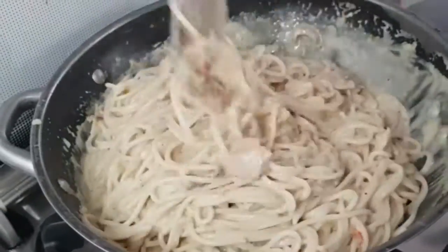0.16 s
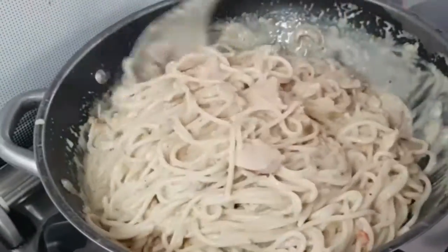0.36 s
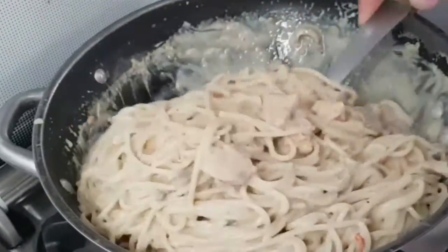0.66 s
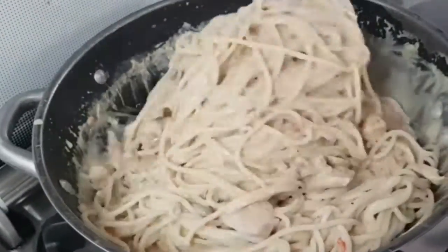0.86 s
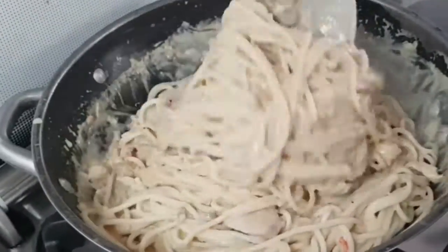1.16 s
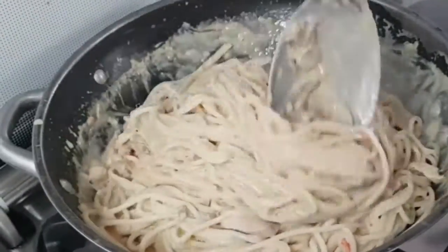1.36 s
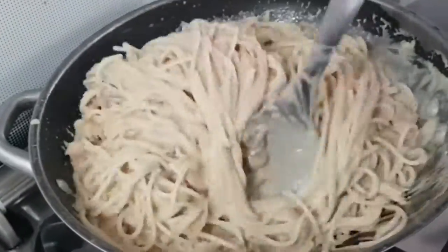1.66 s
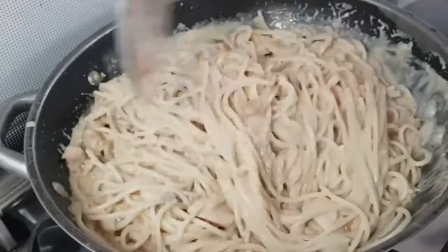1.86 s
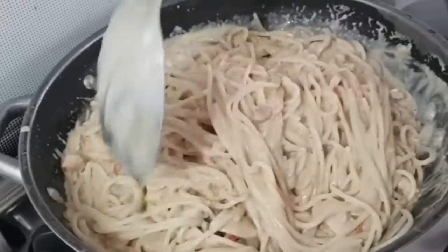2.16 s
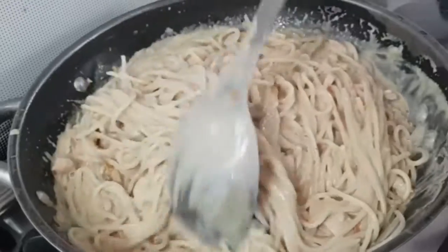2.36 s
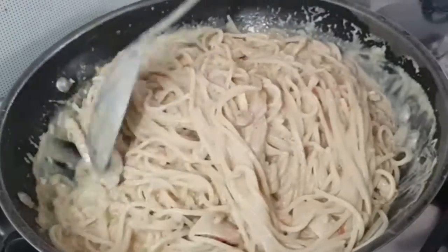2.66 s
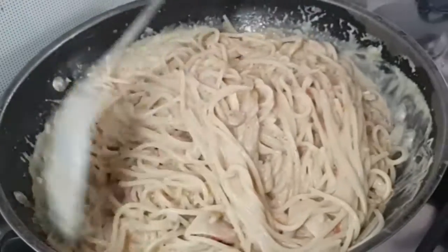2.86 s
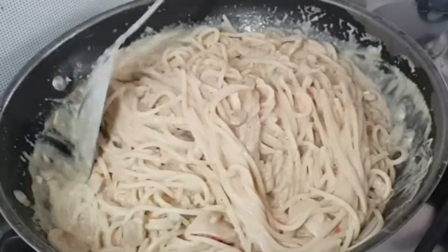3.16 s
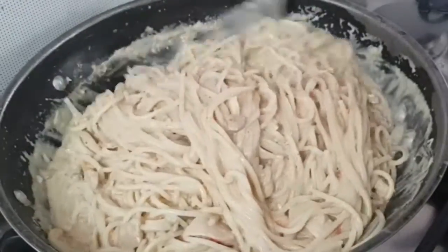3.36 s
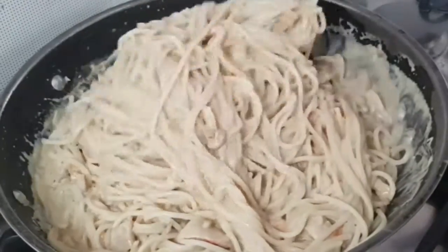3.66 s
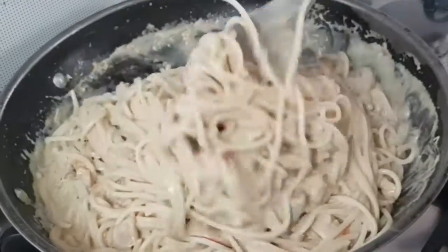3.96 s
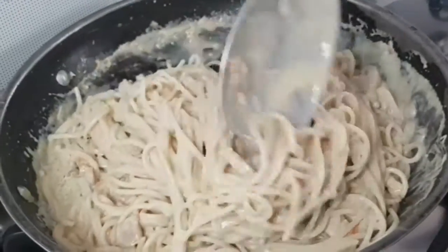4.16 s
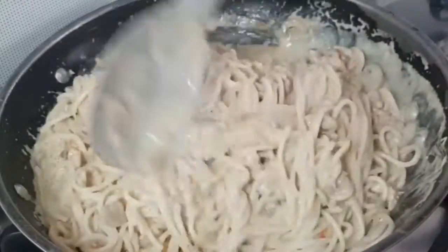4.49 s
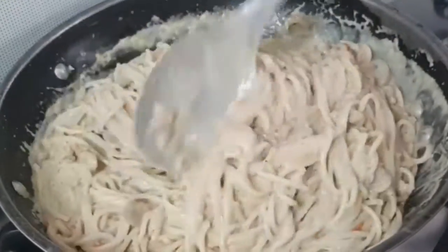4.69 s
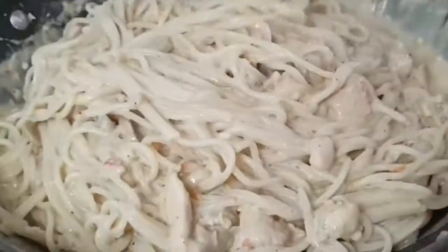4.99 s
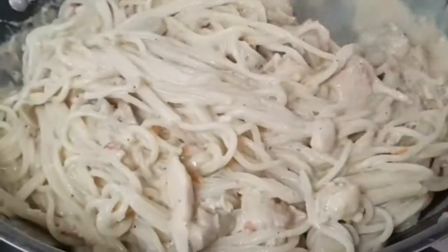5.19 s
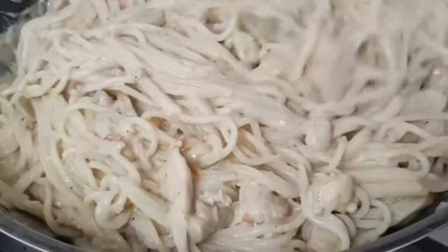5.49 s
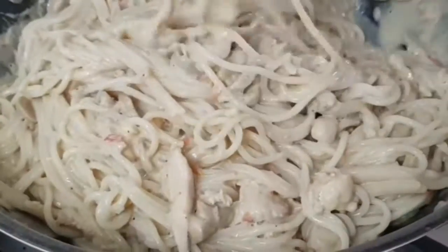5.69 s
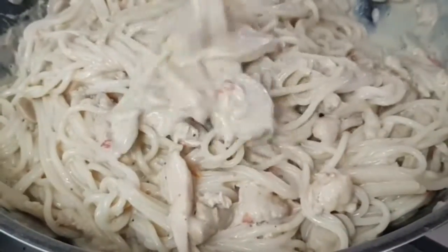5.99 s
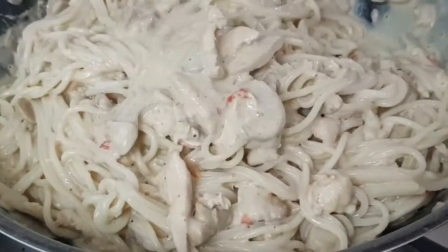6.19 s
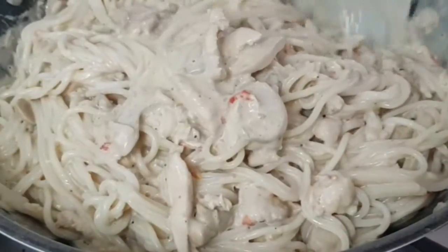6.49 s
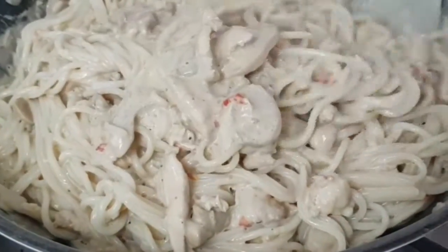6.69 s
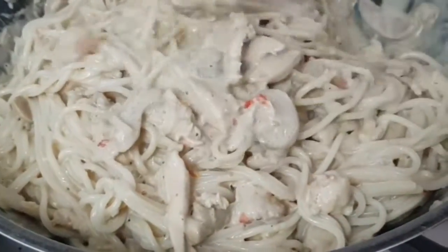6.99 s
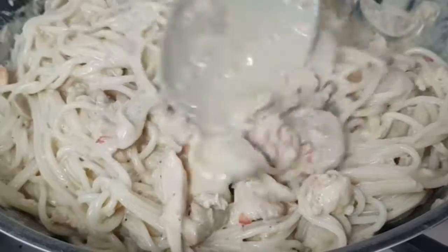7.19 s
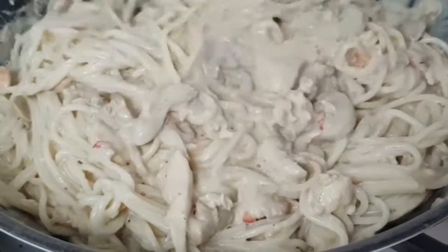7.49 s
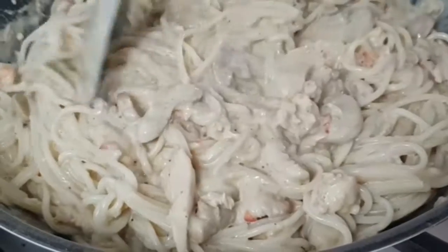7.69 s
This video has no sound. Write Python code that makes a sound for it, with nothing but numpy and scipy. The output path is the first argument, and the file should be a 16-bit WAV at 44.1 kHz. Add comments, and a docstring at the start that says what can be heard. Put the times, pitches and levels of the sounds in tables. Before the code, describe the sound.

Close stereo pickup in a small home kitchen. A spatula turns spaghetti in thick cream sauce, with wet smacks at the start, then a quick cluster of hollow pan knocks. Quiet sticky squelching follows, then another sharp knock, light scrapes and tiny squeaks. A busier scrape ends in the loudest knock past the middle; afterwards mostly wet, crackly squelching, over faint simmer and low mains hum.

```python
"""Small kitchen, heard close up: spaghetti in thick cream sauce is turned with a spatula in a nonstick pan.
Blade blows and scrapes drive damped modes of the pan; its bumps on the grate ring the hob.
The blade squeaks as gliding tones; the sauce squelches, smacks and sizzles as shaped random grains, noise and pops.
An appliance hums as drifting sines over fan air made of coloured noise."""
import sys
import numpy as np
from scipy import signal
from scipy.fft import rfft, irfft, next_fast_len
from scipy.io import wavfile
from scipy.ndimage import uniform_filter1d

SR = 44100
rng = np.random.default_rng(int(sys.argv[2]) if len(sys.argv) > 2 else 0)


def generate_wav(sig):
    """Save sig (samples, or channels by samples) to the path in sys.argv[1] as 16-bit PCM at SR."""
    pcm = np.round(np.clip(np.atleast_2d(sig).T, -1, 1) * 32767).astype(np.int16)
    wavfile.write(sys.argv[1], SR, pcm)


N = 346185
T = np.arange(N) / SR  # seconds
RING_T = T[:SR // 2]

# Blade meets pan. Each row: start in seconds, relative strength in dB, height from floor 0 to bare wall 1,
# relative blade tick in dB, chatter decay constant in seconds, ratio applied to the pan's mode frequencies.
KNOCKS = [(0.4447, -13, 0.62, -19, .0045, 1.03), (0.463, -20, 0.56, -30, .0057, 1.06),
          (0.4743, -24.5, 0.69, -29.5, .003, 1.9), (0.589, -36.5, .7, -66, .01, 1.1),
          (.78, -40, 0.24, -61, 0.021, .59), (1.623, -29, .2, -38, .008, .57),
          (1.655, -26.5, 0.63, -42, .005, 0.78), (1.67, -29, 0.77, -48, .004, 0.99),
          (2.599, -33, 0.017, -31.5, .022, 1), (2.835, -9, 0.31, -14.5, .0033, 1.055),
          (2.8465, -18.5, 0.37, -27, .0037, 0.71), (3.109, -18, 0.054, -15.5, .0042, 1.06),
          (3.1177, -27.5, 0.076, -18, .0036, 1), (3.1235, -20.5, 0.28, -47, .019, 1.01),
          (4.3482, -19, .13, -14, .001, 0.68), (4.373, -54, 0.4, -33, .003, 0.59),
          (4.9541, -23, 0.11, -20, .0048, 1.03), (5.035, -25.5, 0.34, -55, .013, .82),
          (5.207, -25.5, 0.71, -50, .006, 1.05), (5.258, -27, .02, -44, .002, 1),
          (5.4258, -14.5, .9, -25.5, .0035, .95), (5.434, -7, 0.93, -22, .0038, .93),
          (5.446, -19.5, 0.91, -24, .0024, 0.65), (5.467, -28, 0.23, -35.5, .006, 0.82),
          (6.572, -37.5, 0.24, -42, .006, 1.1), (6.6672, -27, 0.4, -21.5, .0016, 0.88)]
# Pan rocks back onto its grate. Each row: start in seconds, level in dB.
ROCKS = [(2.851, -20), (2.884, -28), (2.946, -29), (3.125, -25), (4.386, -31)]
# Modes, nominal before ring() shifts and damps them. Each row: frequency in Hz, relative level in dB,
# t60 in seconds. In turn: loaded pan, its floor on the grate, bare wall (a pair), hob under the pan.
PAN_MODES = [(824, -5, 0.038), (989.5, 0, 0.062), (1115, 1.5, 0.098), (1339, 1.5, 0.044),
             (1484, 2.5, 0.041), (1889, -5.5, 0.11), (2340, -9, 0.084), (2504, -25.5, 0.1),
             (2807, -9.5, 0.17), (3440, -14.5, 0.19), (4110, 2.5, 0.024), (5040, -20.5, 0.075),
             (5490, -16, 0.1), (6200, -34, 0.058)]
FLOOR_MODES = [(145, -4, 0.1), (241.5, -0.5, 0.16), (329, 1.5, 0.06), (377.4, 3.5, 0.088),
               (486.3, -0.5, 0.068), (651.5, -8, 0.1), (800, -18.5, 0.057)]
WALL_MODES = [(1230, -7.5, 0.041), (1230, -16, 0.011)]
HOB_MODES = [(49.8, -0.5, 0.44), (92, -7, 0.27), (119, 13.5, 0.12)]
# Spectra of the blade's dense modes and the pan's crowded minor modes. Each row: Hz, relative dB.
BLADE_SPECTRUM = [(300, -3), (1000, 8.5), (2400, 0), (3300, -1), (4500, 5), (5700, 7.5), (7000, 4),
                  (9000, -0.5), (13000, -1), (15000, -18)]
CLATTER_SPECTRUM = [(150, -35.5), (350, -5.5), (650, -2), (1150, -38.5), (1600, -12), (2300, -1.5),
                    (3500, -7.5), (8000, -54.5)]
# Strokes of the blade. Each row: hardest push in seconds, rise in seconds, release in seconds,
# relative pan level in dB, relative grit level in dB.
SCRAPES = [(.5, 0.018, .2, -42, -40.5), (.68, .03, .04, -44.5, -55.5), (1.622, .05, .05, -38, -33),
           (1.66, 0.065, .05, -34, -35), (2.734, 0.19, .1, -44, -59), (2.93, .02, .35, -48, -62),
           (3.322, 0.091, .1, -36.5, -35.5), (3.39, 0.087, .11, -33.5, -34.5), (3.53, 0.17, .2, -48, -66),
           (5.035, 0.11, .12, -31, -34.5), (5.105, 0.18, .07, -35, -31.5), (5.215, 0.062, .025, -30.5, -54),
           (5.28, 0.15, .15, -45, -58), (5.377, 0.09, .03, -35, -37.5), (5.61, .08, 0.072, -50, -52),
           (6.69, 0.014, .14, -47, -39.5)]
# Pitched stick-slip. Each row: start in seconds, length in seconds, start pitch in Hz, end pitch in Hz,
# level in dB, pitch scatter as a share.
SQUEAKS = [(2.693, 0.12, 2330, 2490, -51, 0.076), (2.705, 0.061, 3700, 3600, -55, 0.017),
           (2.919, 0.17, 1976, 1950, -54, 0.057), (2.928, 0.093, 918, 947, -55, 0.049),
           (3.191, .12, 1820, 1900, -49.5, 0.021), (3.253, 0.091, 1113, 1034, -41, 0.03),
           (3.379, 0.053, 1317, 1212, -35, 0.14), (3.382, 0.022, 2280, 2276, -32, 0.086),
           (3.515, .01, 2570, 2500, -43.5, 0.066), (3.531, 0.023, 1087, 986, -45.5, 0.13),
           (5.003, 0.126, 1020, 1094, -41, 0.1), (5.008, 0.02, 2830, 2786, -33, 0.041),
           (5.061, 0.086, 2480, 2380, -36.5, 0.089), (5.342, 0.05, 2390, 1870, -35.5, 0.11),
           (7.195, 0.012, 3280, 3220, -39, 0.03)]
# Sauce being worked. Each row: time in seconds, squelch in dB, fine fizz in dB, both before the layer gains.
SAUCE_LEVELS = [(0.0, -57.5, -65.5), (1.11, -65.5, -68), (1.62, -59.5, -71), (2.03, -67, -68),
                (2.62, -69, -73), (2.78, -61, -71), (3.17, -62.5, -74), (3.3, -60, -70), (3.52, -62, -69),
                (4.2, -67, -69.5), (4.52, -59, -68), (4.77, -66, -70.5), (5.01, -91, -84), (5.14, -54, -61),
                (5.31, -54, -62), (5.66, -67, -71.5), (6.45, -70.5, -77.5), (6.69, -58.5, -65.5),
                (6.84, -54, -58.5), (7.08, -53, -57), (7.28, -62, -66), (7.85, -67.5, -70.5)]
# Spectra of squelch, fizz and simmer. Each row: Hz, relative dB.
SQUELCH_SPECTRUM = [(300, 3), (700, -2), (1200, -1), (2000, -2), (3000, -3), (4200, 0), (5800, -5),
                    (7200, -6), (9000, -11.5), (14000, -28.5)]
FIZZ_SPECTRUM = [(4000, -25), (7500, -3), (9500, -1.5), (13000, 0.5), (15000, -16)]
SIMMER_SPECTRUM = [(2000, -17.5), (3000, -19), (4200, -10), (6500, 7.5), (9500, -4.5), (13000, 0),
                   (15000, -1)]
# Wet smacks as strands part or land. Each row: start in seconds, level in dB, centre in Hz, length in seconds.
SMACKS = [(0.063, -31.5, 5800, 0.045), (0.073, -40, 1990, 0.05), (0.329, -51.5, 6500, 0.03),
          (0.839, -50.5, 4530, 0.0093), (1.599, -42.5, 5530, 0.037), (1.766, -50.5, 8650, 0.017),
          (1.947, -55, 4450, 0.097), (2.293, -54.5, 6400, 0.028), (2.589, -42.5, 7250, 0.022),
          (2.815, -39.5, 4970, 0.024), (3.093, -33.5, 7000, 0.028), (3.26, -45.5, 5730, 0.005),
          (3.307, -40.5, 5230, 0.02), (4.282, -44, 7760, 0.0024), (4.698, -53, 3580, 0.03),
          (5.367, -34, 4150, 0.009), (6.018, -53.5, 5950, 0.0062), (7.121, -43.5, 9000, 0.029),
          (7.198, -42.5, 4100, 0.0044), (7.464, -48.5, 7100, 0.011), (7.495, -48, 4570, 0.019)]
# Appliance hum. Each row: frequency in Hz, nominal level in dB rms.
HUM = [(59.9, -47), (119.8, -56), (242, -67)]
# Kitchen air with a fan's broad whirr near 1.7 kHz. Each row: Hz, relative dB.
AIR_SPECTRUM = [(20, -22), (62, 0), (90, -3.5), (119, -6.5), (200, -23.5), (240, -17.5), (290, -22),
                (480, -29.5), (720, -30.5), (1200, -42.5), (1560, -27.5), (1800, -28), (2300, -49.5),
                (4000, -82.5)]
# Slow level change of hum, air and simmer. Each row: time in seconds, gain in dB.
BACKGROUND_GAIN = [(0, 1), (4.9, 0.5), (5.6, -2), (6.5, -2), (6.9, 0.5), (7.85, 1)]
# Further spectra: air's side signal, air's bass, room tail, the two ports. Each row: Hz, gain in dB.
AIR_SIDE = [(120, -15.5), (400, -9), (1500, 1.5)]
AIR_BASS = [(25, -5), (60, -11.5), (120, -3), (200, 0.5)]
TAIL_LOW = [(120, -20.5), (400, 4), (800, -1.5), (1500, -0.5), (5000, -1.5), (14000, -27)]
TAIL_HIGH = [(1000, -12.0), (5000, -0.5), (14000, 3.0)]
LEFT_PORT = [(200, 0.5), (380, -1.0), (750, 3.5), (1300, -1),
             (2800, -0.5), (5800, -4.0), (8500, -3.0), (12500, -1.0)]
RIGHT_PORT = [(200, -0.4), (380, 1.6), (750, -1.0), (1300, -0.06),
              (2800, -2.5), (5800, 0), (8500, -5.0), (12500, 0.9)]

# loss of each body at its worst strike height: floor at the wall, wall at the floor, pan at either end
FLOOR_LOSS_DB, WALL_LOSS_DB, PAN_LOSS_DB = 25, 36.5, 16
WALL_SIDE_DB, SCRAPE_SIDE_DB, SQUEAK_SIDE_DB, BACKGROUND_SIDE_DB = 1.5, 1.3, 1.8, 0.65  # left minus right
STROKE_RANGE_DB = 23  # gained over the rise, lost over the release
SQUELCH_GAIN_DB, FIZZ_GAIN_DB = 5.5, 7.5
CLUMP_DB, CLUMP_RATE_HZ = 1.4, 31  # depth and knot rate of the uneven sauce level
SIMMER_DB, BUBBLES_DB, AIR_DB = -64.5, -72, -59.5  # simmer and air before BACKGROUND_GAIN
# chance smacks: level relative to the SAUCE_LEVELS squelch, centre pitch and its spread, length
STRAY_DB, STRAY_HZ, STRAY_OCTAVES, STRAY_S = -0.5, 5600, 0.28, 0.01
PORT_LAG_S = .00011
TOP_HZ = 14550


def knocks():
    """Each blow rings floor, pan or wall by strike height, while the blade chatters briefly and ticks."""
    out, t = np.zeros((2, N)), RING_T
    floor, wall, hob = ring(FLOOR_MODES), ring(WALL_MODES), ring(HOB_MODES)
    for s, db, height, tick_db, chatter_s, stretch in KNOCKS:
        floor_db = db - FLOOR_LOSS_DB * height
        wall_db = db - WALL_LOSS_DB * (1 - height)
        pan_db = db - 1.5 - PAN_LOSS_DB * (2 * height - 1) ** 2
        decay = np.exp(-t / chatter_s) + amp(-7.5) * np.exp(-t / 0.014)
        chatter = grains(6000, 6.6, size=len(t)) * decay
        push = 0.39 * chatter / np.sqrt(np.sum(chatter ** 2))
        push[0] += 1  # the blow itself
        body = convolve(push, amp(pan_db) * ring(PAN_MODES, stretch))
        body = body + amp(floor_db) * floor
        body = body + place(amp(wall_db) * wall, WALL_SIDE_DB)
        rattle = scatter(chatter, t60=0.028, share=12.0)
        tick = amp(tick_db - 6.5) * colour(rattle, BLADE_SPECTRUM)
        clatter = amp(pan_db) * colour(rattle, CLATTER_SPECTRUM)
        add(out, s, body + (tick + clatter) * (t < .25))
    for s, db in ROCKS:
        add(out, s, amp(db) * hob * (1 - np.exp(-t / 0.0025)))
    return out


def scrapes():
    """Dense slips drive the pan's modes, which shift as the blade travels, with grit from its edge."""
    press, grit = np.zeros(N), np.zeros(N)
    for s, rise_s, release_s, pan_db, grit_db in SCRAPES:
        push = stroke(s, rise_s, release_s)
        press = np.maximum(press, amp(pan_db) * push)
        grit = np.maximum(grit, amp(grit_db) * push)
    # the sauce cushions each stroke
    press, grit = uniform_filter1d(np.array([press, grit]), size=600)
    slips = grains(2600, 2.4) * amp(2 * walk(110))
    body = 0
    for stretch in (.86, .95, 1.03):  # each tuning drifts in level on its own
        contact = scatter(slips * amp(5.5 * walk(30)), t60=0.016, share=0.45)
        response = ring(PAN_MODES, stretch, damping=2.37) + 0.24 * ring(FLOOR_MODES, stretch)
        body = body + convolve(contact, response)
    edge = unit(colour(scatter(slips, t60=0.025, share=5.4), BLADE_SPECTRUM))
    return place(amp(-1.5) * press * unit(body), SCRAPE_SIDE_DB) + amp(-3.0) * grit * edge


def stroke(s, rise_s, release_s):
    """Pressure of one stroke: builds exponentially to the hardest push at s, then lets go."""
    distance = np.maximum((s - T) / rise_s, (T - s) / release_s)
    return amp(-STROKE_RANGE_DB * np.minimum(distance, 10))


def squeaks():
    """The blade catches and slips at an unsteady pitch: a thin squeal when even, a rasp when scattered."""
    out = np.zeros(N)
    for s, length_s, start_hz, end_hz, db, unsteady in SQUEAKS:
        size = int(length_s * SR)
        hz = np.linspace(start_hz, end_hz, size) * (1 + unsteady * walk(700, size=size))
        phase = 2 * np.pi * np.cumsum(hz) / SR
        wave = np.sin(phase) + 0.24 * np.sin(2 * phase)
        tone = unit(wave * amp(2 * walk(255, size=size)))
        add(out, s, amp(db) * tone * signal.windows.tukey(size, .5))
    return place(out, SQUEAK_SIDE_DB)


def sauce():
    """Tiny films and bubbles burst in the worked sauce over a simmer; bigger smacks come as strands part."""
    s, squelch_db, fizz_db = np.transpose(SAUCE_LEVELS)
    films = scatter(grains(1600, 3.3), t60=0.11, share=4.3) * amp(CLUMP_DB * walk(CLUMP_RATE_HZ))
    out = amp(np.interp(T, s, squelch_db) + SQUELCH_GAIN_DB) * unit(colour(films, SQUELCH_SPECTRUM))
    out += amp(np.interp(T, s, fizz_db) + FIZZ_GAIN_DB) * unit(colour(films, FIZZ_SPECTRUM))
    simmer = unit(colour(rng.standard_normal((2, N)), SIMMER_SPECTRUM))
    out += amp(SIMMER_DB) * background_gain() * simmer
    out += amp(BUBBLES_DB) * bubbles(count=400, low_hz=4500, high_hz=13000, cycles=2.5, spread_db=12)
    for at, db, hz, length_s in SMACKS + stray_smacks(count=14):
        add(out, at, amp(db) * smack(hz, length_s))
    return out


def smack(hz, length_s):
    """One wet burst: crackle around hz swells to a peak at half its length, with a weaker slow tail."""
    swell = RING_T / length_s * 2
    crackle = scatter(grains(6000, 1.8, size=len(RING_T)), t60=.012, share=2.4)
    burst = colour(crackle, [(200, -17), (hz / 2, -7), (hz, 0), (hz * 1.73, -11), (hz * 2.7, -20)])
    tail = amp(-5.5) * np.minimum(swell, 1) * np.exp(-RING_T / 0.059)
    return unit(burst) * (swell * np.exp(1 - swell) + tail)


def stray_smacks(count):
    """Faint smacks at random moments, stronger while the sauce is worked; rows like those of SMACKS."""
    when, pitch = rng.random(count) * T[-1], rng.standard_normal(count)
    sauce_s, squelch_db, _ = np.transpose(SAUCE_LEVELS)
    rows = []
    for s, p in zip(when, pitch):
        db = np.interp(s, sauce_s, squelch_db) + STRAY_DB
        rows.append((s, db, STRAY_HZ * 2 ** (STRAY_OCTAVES * p), STRAY_S))
    return rows


def bubbles(count, low_hz, high_hz, cycles, spread_db):
    """Lone pops at random times, each ringing a few cycles on its own rising pitch; rms 1."""
    out, t = np.zeros((2, N)), RING_T[:1024]
    for when, pitch, strength, side in rng.random((count, 4)):
        start_hz = low_hz * (high_hz / low_hz) ** pitch
        turns = t * start_hz * (1 + t / .1)
        pop = np.sin(2 * np.pi * turns) * np.exp(-turns / cycles) * amp(spread_db * strength ** 3)
        add(out, when * T[-1], place(pop, 12 * (side - .5)))
    return unit(out)


def kitchen(x):
    """Hard nearby surfaces give a short tail, duller as it fades."""
    t = RING_T
    low = colour(rng.standard_normal((2, len(t))), TAIL_LOW) * np.exp(-np.log(1000) * t / 0.31)
    high = colour(rng.standard_normal((2, len(t))), TAIL_HIGH) * np.exp(-np.log(1000) * t / 0.2)
    tail = (low + high) * (t > .005)
    return x + amp(-36.5) * convolve(x, tail)


def background():
    """A slightly wavering mains hum over soft fan air, nearly alike on both sides in the bass."""
    hum = 0
    for k, (hz, db) in enumerate(HUM):
        waver = amp(.8 * walk(6))
        phase = 2 * np.pi * hz * T + 0.13 * (k + 1) * walk(8)
        hum = hum + amp(db) * waver * np.sqrt(2) * np.sin(phase)
    mid, side = colour(rng.standard_normal((2, N)), AIR_SPECTRUM)
    side = colour(side, AIR_SIDE)
    # AIR_DB refers to the middle range of mid
    middle = signal.sosfilt(signal.butter(4, [200, 2500], "band", fs=SR, output="sos"), mid)
    air = colour(mid + side * np.array([[1], [-1]]), AIR_BASS)
    air *= amp(AIR_DB) / middle.std()
    return place(hum + air, BACKGROUND_SIDE_DB) * background_gain()


def background_gain():
    """Slow gain curve shared by hum, air and simmer."""
    return amp(np.interp(T, *np.transpose(BACKGROUND_GAIN)))


def amp(db):
    """Decibels to gain."""
    return 10 ** (np.asarray(db) / 20)


def unit(x):
    """Scale to rms 1."""
    return x / np.sqrt(np.mean(x ** 2) + 1e-20)


def add(out, s, x):
    """Mix x into out from time s on."""
    i = max(int(s * SR), 0)
    out[..., i:i + x.shape[-1]] += x[..., :N - i]


def place(x, side_db):
    """Set a sound between left and right by their level difference."""
    return x * amp(np.array([[side_db], [-side_db]]) / 2)


def convolve(x, response):
    """Pass a sound through a response, keeping its length."""
    return signal.fftconvolve(np.atleast_2d(x), np.atleast_2d(response), axes=-1)[:, :x.shape[-1]]


def colour(x, points):
    """Shape a sound with a (Hz, dB) spectrum, interpolated over log frequency."""
    hz, db = np.transpose(points)
    size = next_fast_len(x.shape[-1])
    bins_hz = np.maximum(np.fft.rfftfreq(size, 1 / SR), 1)
    gain = amp(np.interp(np.log(bins_hz), np.log(hz), db))
    return irfft(rfft(x, size) * gain, size)[..., :x.shape[-1]]


def walk(rate_hz, size=N):
    """Random drift: straight lines between normal knots of spread 1."""
    knots = rng.standard_normal(4096)
    return np.interp(np.arange(size) / SR * rate_hz, np.arange(4096), knots)


def ring(modes, stretch=0.98, damping=0.97):
    """Response of a set of damped modes, with peak 1; stretch scales pitch, damping the decay rate."""
    y = np.zeros(len(RING_T))
    for k, (hz, db, t60_s) in enumerate(modes):
        decay = amp(db - 60 * RING_T * damping / t60_s)
        y += (-1) ** k * decay * np.sin(2 * np.pi * hz * stretch * RING_T)
    return y / np.abs(y).max()


def grains(rate_hz, spread_db, size=N):
    """Random tiny impulses of uneven strength, rms 1."""
    chance, strength = rng.random(size), rng.exponential(size=size)
    sign = np.sign(rng.standard_normal(size))
    return unit((chance < rate_hz / SR) * amp(spread_db * np.minimum(strength, 4)) * sign)


def scatter(x, t60, share):
    """Every impulse drags a short diffuse hiss behind it, unrelated left and right; t60 in seconds."""
    keep = np.exp(-2 * np.log(1000) / (t60 * SR))
    energy = signal.lfilter([1 - keep], [1, -keep], x ** 2 + 1e-20)
    hiss = np.sqrt(energy) * rng.standard_normal((2, len(x)))
    return (x + share * hiss) / np.sqrt(1 + share ** 2)


def scene():
    """Pan and sauce in the kitchen, over the hum; the pan's sound reaches the left port first."""
    pan = knocks() + scrapes() + squeaks()
    pan[1] = np.roll(pan[1], int(round(PORT_LAG_S * SR)))
    return kitchen(pan) + sauce() + background()


def record(dry):
    """The two microphone ports colour the sound differently; the top is cut steeply."""
    ports = np.array([colour(dry[0], LEFT_PORT), colour(dry[1], RIGHT_PORT)])
    return signal.sosfilt(signal.ellip(10, .2, 80, TOP_HZ, fs=SR, output="sos"), ports)


dry = scene()
out = record(dry)
generate_wav(out)
```